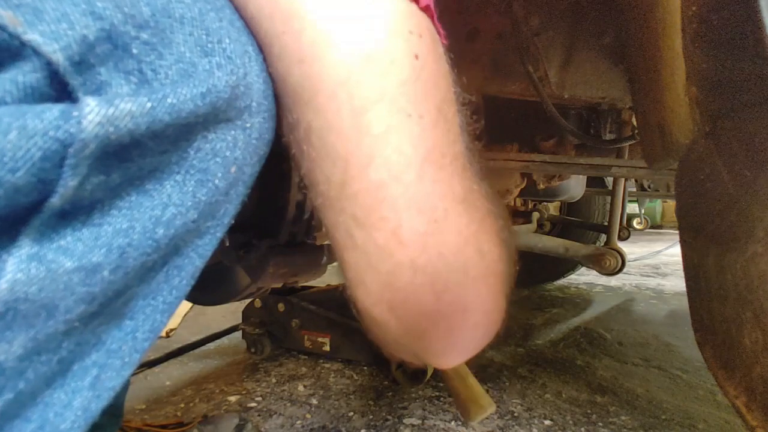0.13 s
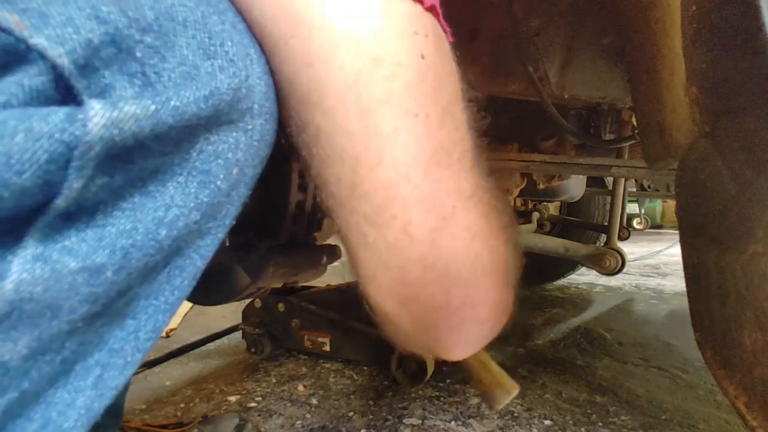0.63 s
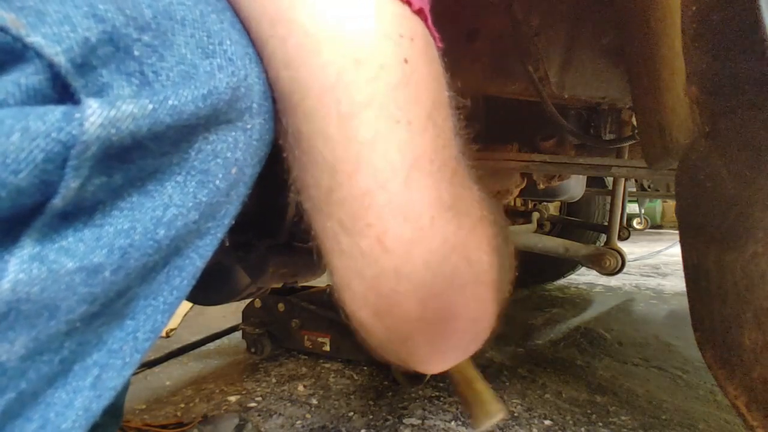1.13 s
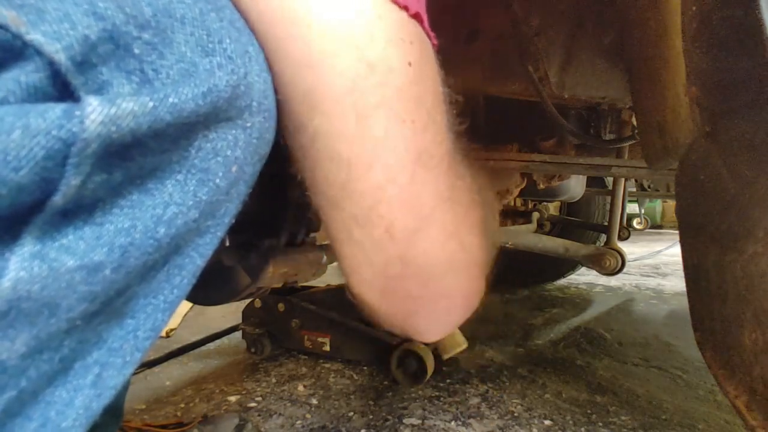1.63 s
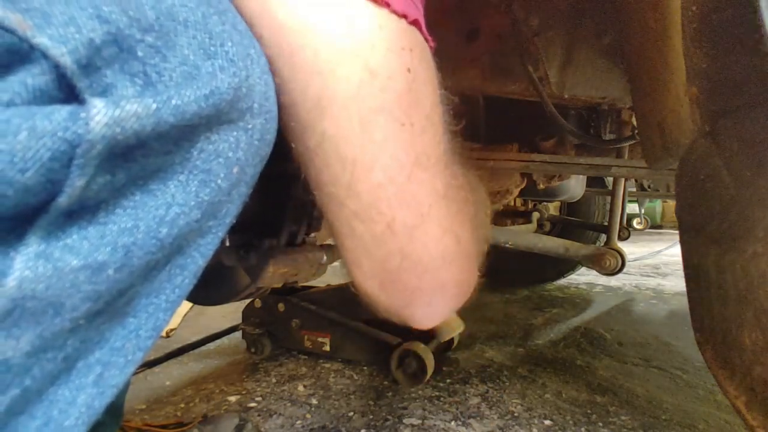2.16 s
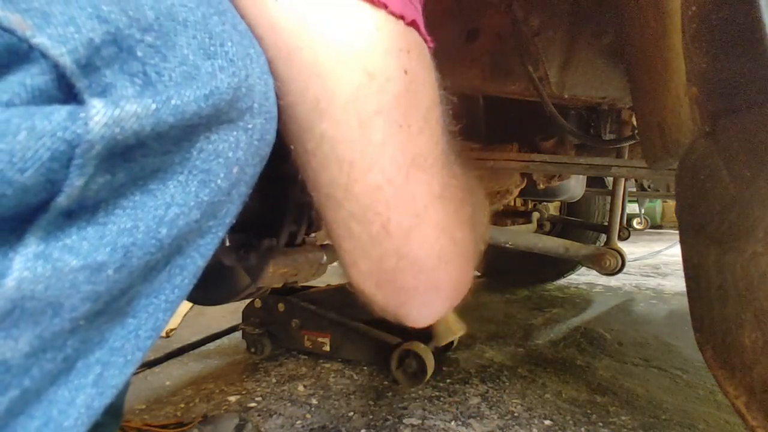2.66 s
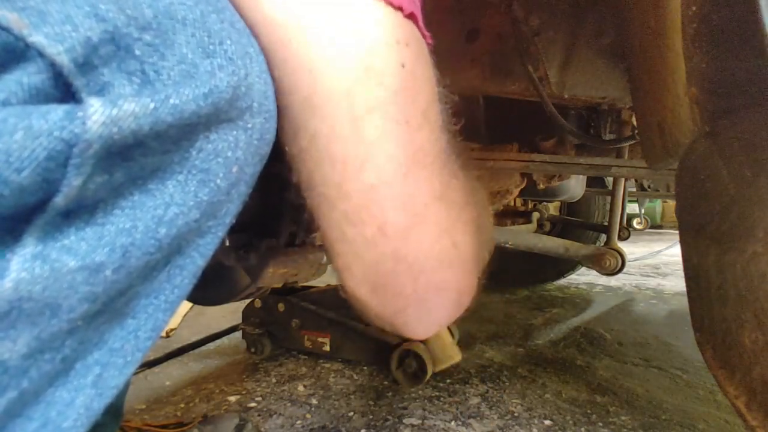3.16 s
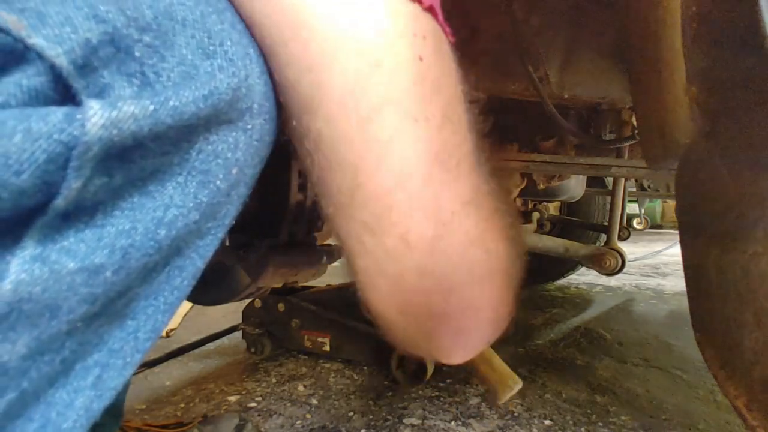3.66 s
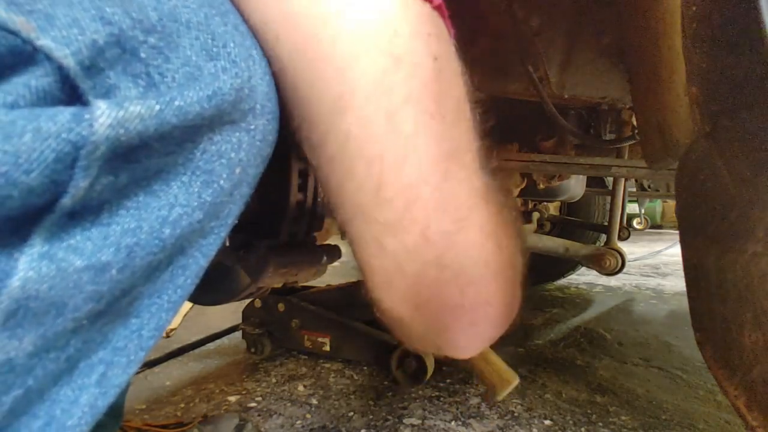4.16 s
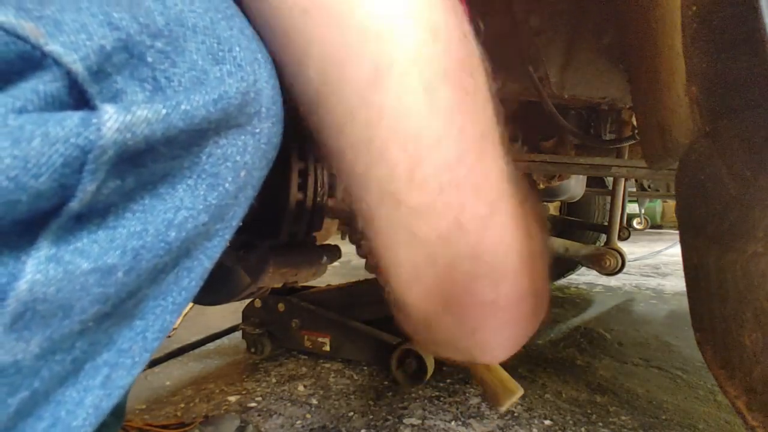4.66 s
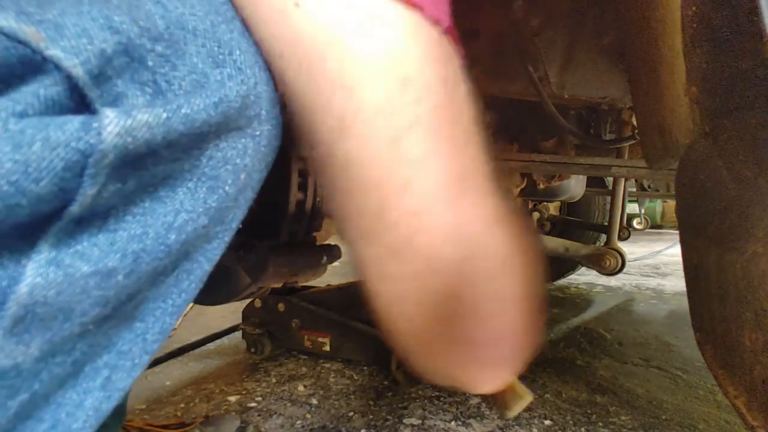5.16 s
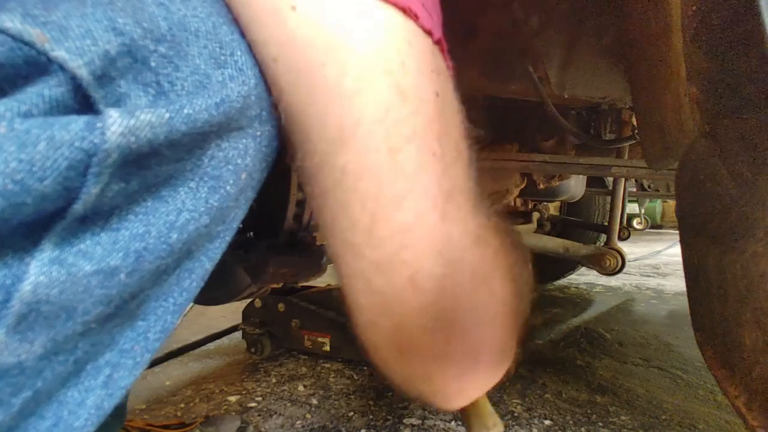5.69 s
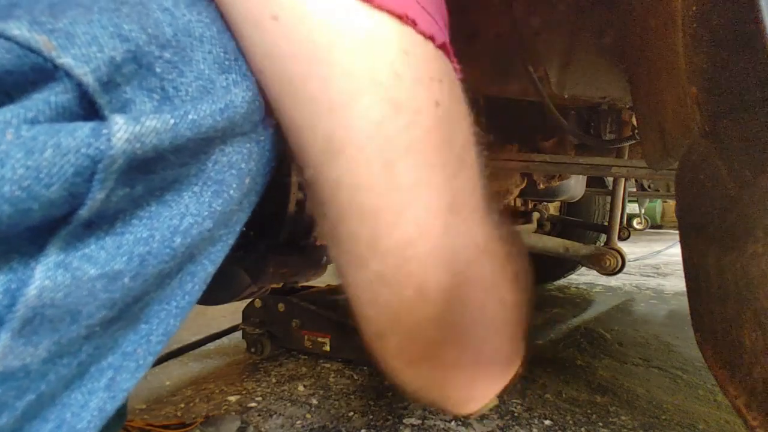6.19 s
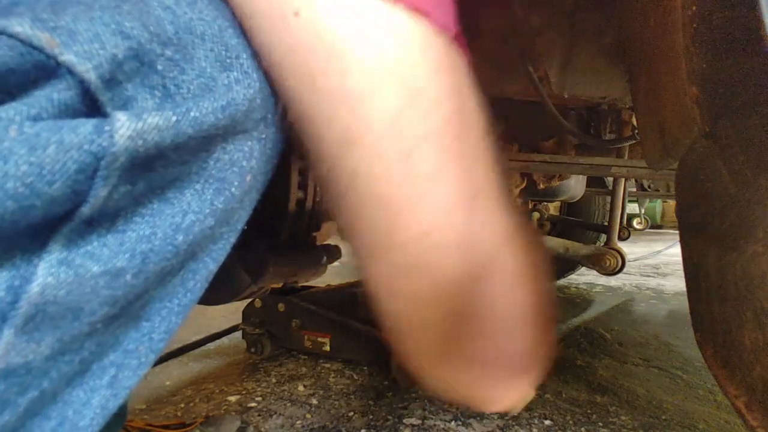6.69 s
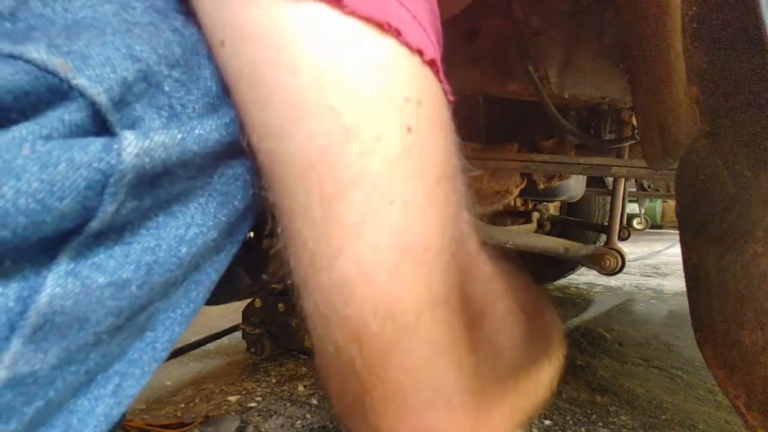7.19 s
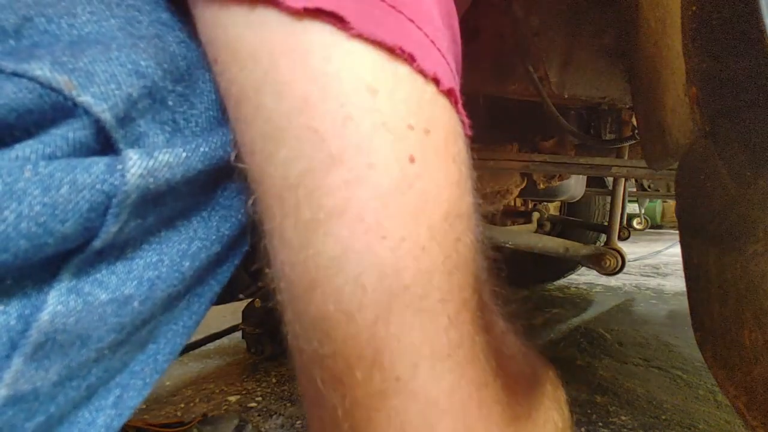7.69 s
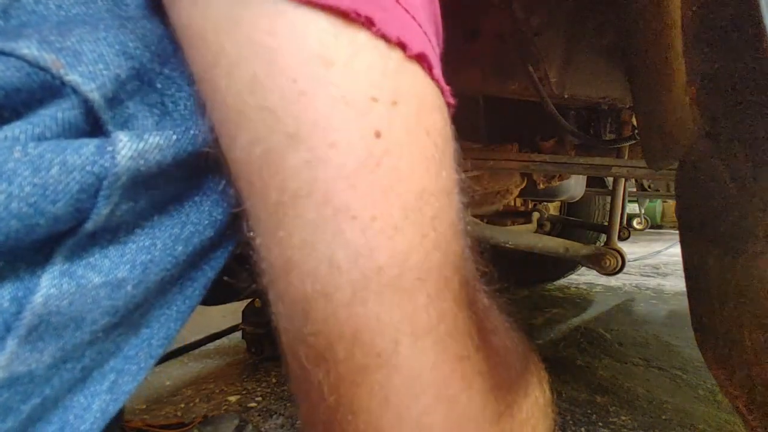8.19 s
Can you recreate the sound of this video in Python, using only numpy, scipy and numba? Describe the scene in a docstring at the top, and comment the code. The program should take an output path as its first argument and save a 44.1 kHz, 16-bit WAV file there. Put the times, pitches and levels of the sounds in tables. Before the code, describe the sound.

On a concrete garage floor, a phone at arm's length catches loud metal hammering on a hub. Twenty-seven brisk blows vary in pitch and brightness, dull and bodied at first, then freer and more ringing, with a brief gap midway and one long singing note. They end abruptly; a quiet cricket trills at left over thin hiss, with a few barely audible taps.

```python
"""A hammer strikes a truck's wheel hub in quick blows, an arm's length from a phone on a garage floor.
Each blow cracks and clangs as shaped noise and rings hub and frame as beating damped sines.
Small knocks, short noise bursts, follow as the hammer is laid down.
A cricket trills on the left, noise through narrow resonances, over faint air of coloured noise.
The phone's gain control dips slightly on every blow; its slow gain drifts under cricket and air."""
import sys
import numpy as np
from scipy import signal
from scipy.fft import rfft, irfft
from scipy.io import wavfile
from scipy.ndimage import uniform_filter1d
from numba import njit

SR = 44100
rng = np.random.default_rng(int(sys.argv[2]) if len(sys.argv) > 2 else 0)


def wav_record(signal):
    """Record a signal, one row per channel, as 16-bit PCM in the file named by sys.argv[1]."""
    frames = np.transpose(np.atleast_2d(signal))
    bounded = np.clip(frames, -1, 1)
    # unit amplitude maps onto the largest positive 16-bit level
    quanta = np.round(bounded * 32767).astype(np.int16)
    wavfile.write(sys.argv[1], SR, quanta)


def elevation(decibels):
    """Turn decibel levels (scalar or array-like) into linear amplitude ratios."""
    levels = np.asarray(decibels, float)
    return 10 ** (levels / 20)


N = 367353

# Hammer blows. Each row: start in seconds, level in dB, brightness in dB, pitch of the leading
# clank in Hz, gain of the long ring in dB.
BLOWS = [(0.005, -13.5, -13.5, 2450, -27), (0.219, -12.5, -11, 1751, -23.5),
         (0.426, -13.5, -25, 1815, -24.5), (0.645, -9, -20.5, 1850, -25.5), (0.856, -16, -4.5, 1778, -25.5),
         (1.063, -15, -6.5, 4270, -25.5), (1.268, -11.5, -15.5, 1463, -22), (1.494, -13.5, -6, 2670, -29.5),
         (1.716, -12.5, -12.5, 1960, -14), (1.926, -12, -10, 1851, -19), (2.138, -15.5, -4, 1638, -25),
         (2.368, -15.5, -3.5, 3533, -22.5), (2.591, -17, -0.5, 2687, -14), (2.819, -15.5, -7, 1760, -16),
         (3.059, -11.5, -11, 3700, -10.5), (3.628, -11.5, -16.5, 4094, -3),
         (3.871, -10.5, -10.5, 2515, -21), (4.121, -15, -4, 2717, -14), (4.382, -15, -3.5, 2743, 5),
         (4.677, -12.5, -7, 1790, -18.5), (4.953, -9.5, -7.5, 3950, -21), (5.24, -10, -7.5, 2620, -18),
         (5.539, -10, -9.5, 4140, -19.5), (5.832, -7.5, -14.5, 2785, -19.5), (6.14, -9.5, -7, 1790, -19.5),
         (6.464, -8, -7, 2622, -20.5), (6.78, -10, -7, 3960, -20.5)]
# The struck spot wanders. Each row: time in seconds, place from 0 = bolted part to 1 = free rim,
# gain of the axle's deep sway in dB.
STRUCK_SPOT = [(0, 0.003, -12), (1.1, 0.044, -15.5), (1.9, 0.24, -13), (2.82, .45, -20),
               (3.06, 1.01, -15.5), (3.63, .6, -8.5), (4.3, 0.94, -16), (4.68, 1.023, -22),
               (6.8, 0.84, -19.5)]
# Ringing modes of the hub. Each row: frequency in Hz, level in dB, t60 in seconds before BEND.
HUB_MODES = [(861, -16, .12), (1060, -7, .2), (1778, -4, .2), (1815, -12, .22), (1938, -14, .16),
             (2485, -6, .36), (2608, -11, .22), (2688, -15, .22), (2775, -10, .18), (3490, -13, .2),
             (3955, -9, .34), (4255, -15, .22), (5453, -14, .2)]
# The thin note that some blows leave singing: frequency in Hz, level in dB, t60 in seconds before BEND.
LONG_RING = (1052, -13, .46)
# Swinging modes of the frame. Each row: frequency in Hz, level in dB, t60 in seconds before BEND.
FRAME_MODES = [(145, -17, .5), (187, -8, .35), (275, 0, .32), (305, -5, .3), (359, -2, .32), (407, -3, .32),
               (436, -4, .36), (490, -2, .22), (930, -29, .6), (1340, -27, 1.0)]
# Dense clang of axle, springs and garage. Each row: frequency in Hz, level in dB, t60 in seconds
# before BEND, left-right likeness from 0 to 1.
CLANG_BANDS = [(41.76, -36.5, 0.36, 0.6), (108, -14, 1, 0.8), (250, 1, 0.46, 0.1), (526, -5, 0.18, 0.7),
               (850, -9, 0.25, 1), (1250, -12.5, 0.24, 0), (2417, -10.5, 0.41, 0), (4110, 1, 0.38, 0),
               (6118, -0.5, 0.38, 0), (7780, -8, 0.24, .3), (12200, -11.5, 0.23, 0.5),
               (15400, -15.5, 0.11, .1)]
# Hub modes struck at the bolts, level in dB against the rim: under 1.4 kHz, to 2.2 kHz, to 3 kHz, above.
HELD_DB = [-21, -14.5, -15, -23.5]
# Small knocks as the hammer is laid down. Each row: start in seconds, level in dB, centre in Hz,
# t60 in seconds before BEND.
KNOCKS = [(7.412, -68, 300, 0.3), (8.018, -61, 900, 0.031), (8.038, -65, 1200, 0.05),
          (8.136, -70.5, 7020, .02)]
# Cricket level on the left as the phone's slow gain sinks and recovers. Each row: time in seconds,
# level in dB.
CRICKET_GAIN = [(0, -59.5), (3.6, -61), (6.0, -64.5), (7.1, -73.5), (7.3, -73), (7.6, -69.5), (7.9, -64.5),
                (8.33, -61)]
# Resonances of the cricket's wing. Each row: frequency in Hz, width in Hz, level in dB.
WING = [(7030, 120, -14), (7200, 150, -15), (7440, 60, 0), (7590, 90, -3)]
# Colour of the air. Each row: frequency in Hz, relative density in dB per Hz.
AIR_COLOUR = [(30, -13.5), (60, -4), (110, 0), (200, -2.5), (380, -4.5), (1100, -15.5), (3800, -15.5),
              (7300, -15), (8700, -17.5), (11000, -25), (15200, -10), (16500, -24.5)]

HUB_DB, FRAME_DB, CLANG_DB, AIR_DB = -1.5, -3, -13, -69.5
BLOW_SAMPLES = 20000
BEND_DB_PER_S2 = 70  # steepens every fall
THUD_DB, THUD_LOSS_DB, THUD_GONE_PLACE = -10, -13, 0.31  # at the bolts; lost by this place
THUD_RISE_S, THUD_RISE_HZ = 0.011, 300  # band rise holds at this frequency and goes with the period
CRACK_DB, CRACK_DB_PER_PLACE, CRACK_DB_PER_BRIGHT_DB = 9, -3.5, -.2  # over the clang
CRACK_RISE_S, CRACK_T60_S = 0.0013, 0.091
TICK_DB, TICK_DB_PER_PLACE, TICK_S, TICK_WIDTH_S = 6, -3, 0.0015, 0.0015  # over the crack
CLANK_DB, CLANK_DB_PER_BRIGHT_DB, CLANK_WIDTH_HZ, CLANK_T60_S = 0.5, .45, 140, 0.31
BODY_DB_PER_PLACE = 1.5  # 450 to 1200 Hz fills toward the rim
BRACKET_DB_PER_PLACE = -11.5  # frame modes above 800 Hz fade toward the rim
# blows brighter than about GLANCE_DB glance: treble offset above 7.7 kHz, square and glancing
GLANCE_DB, GLANCE_SPAN_DB, SQUARE_TREBLE_DB, GLANCING_TREBLE_DB = -7, 0.1, -5, 0
KNOCK_OCTAVES = 0.833  # spread of a knock's colour


def noise(like, count):
    """Left and right noise spectra, alike by a share that depends on frequency."""
    mid, side = rfft(rng.standard_normal((count, 2, len(like) * 2 - 2))).transpose(1, 0, 2)
    like = np.clip(like, 0, 1)
    shared = np.sqrt(1 + like) * mid[:, None]
    opposed = np.sqrt(1 - like) * side[:, None] * [[1], [-1]]
    return (shared + opposed) / np.sqrt(2)


def fade(t, t60_s, rise_s):
    """A rounded rise, then a fall in dB that steepens as it goes."""
    rise = 1 - np.exp(-(t / rise_s) ** 2)
    return rise * elevation(-60 * t / t60_s - BEND_DB_PER_S2 * t ** 2)


def air():
    """Faint air: coloured noise, its bass partly shared by both ports; the treble is heard unsteady."""
    hz = np.fft.rfftfreq(N + 1, 1 / SR) + 1
    knots_hz, knots_db = np.transpose(AIR_COLOUR)
    colour = elevation(np.interp(np.log(hz), np.log(knots_hz), knots_db))
    spectra = noise(0.35 / (1 + (hz / 450) ** 2), count=1)[0] * colour
    low, treble = (irfft(spectra * part)[:, :N] for part in (hz < 11500, hz >= 11500))
    steps = np.repeat(rng.standard_normal((2, N // 1500 + 1)), repeats=1500, axis=1)
    unsteady = uniform_filter1d(steps, size=900)[:, :N]
    # the treble is stronger on the left
    hiss = low + treble * elevation([[1.5], [-1.5]] + 3.2 * unsteady)
    return elevation(AIR_DB) * hiss / low.std()


def cricket():
    """Uneven wing strokes, 46 a second, ring narrow resonances, mostly into the left port."""
    t, hz = np.arange(N) / SR, np.fft.rfftfreq(N, 1 / SR)
    wing = sum(elevation(db) / np.sqrt(1 + (2 * (hz - f) / width) ** 4) for f, width, db in WING)
    wobble = uniform_filter1d(rng.standard_normal(N), size=2000) * 45
    strokes = 1.8 + np.cos(np.pi * 46 * t + 0.78 * wobble) ** 2
    song = strokes * irfft(rfft(rng.standard_normal(N)) * wing, N)
    gain = elevation(np.interp(t, *np.transpose(CRICKET_GAIN)))
    return song / song.std() * gain * elevation([[0], [-17]])


def knocks():
    """Soft wooden taps on concrete: short noise bursts, each coloured around its centre."""
    out, t = np.zeros(N + BLOW_SAMPLES), np.arange(BLOW_SAMPLES) / SR
    hz = np.fft.rfftfreq(BLOW_SAMPLES, 1 / SR) + 1
    grits = rng.standard_normal((len(KNOCKS), BLOW_SAMPLES))
    for (start_s, db, centre_hz, t60_s), grit in zip(KNOCKS, grits):
        tap = irfft(rfft(grit) * np.exp(-(np.log2(hz / centre_hz) / KNOCK_OCTAVES) ** 2))
        start = int(start_s * SR)
        out[start:start + BLOW_SAMPLES] += elevation(db) * fade(t, t60_s, 0.00077) * tap / tap.std()
    return out[:N]


def modes(table, gain_db, rise_s, scatter_db, spread_rad, beat_hz):
    """Damped sines, each a close trio that beats; size and phase vary with blow, ear and sine."""
    hz, db, t60_s = np.tile(np.transpose(table), reps=3)[:, :, None]
    hz = hz + beat_hz * np.repeat([0, 1, -1.6], len(table))[:, None]
    t = np.arange(BLOW_SAMPLES) / SR
    chance = rng.standard_normal((len(BLOWS), 2, 2, len(hz)))
    trio_db = np.repeat([0, -4, -10], len(table))
    size = elevation(np.tile(gain_db, reps=3)[:, None] + db.T + trio_db + scatter_db * chance[:, 0])
    phase = 3 * chance[:, :1, 1] + spread_rad * chance[:, 1]
    sines = fade(t, t60_s, rise_s) * np.exp(2j * np.pi * hz * t)
    return ((size * np.exp(1j * phase)) @ sines).imag


def clank(spectra, hz, t, bright_db, clank_hz):
    """One rough resonance leads each clang: noise through a peak, louder in bright blows."""
    peak = 1 / (1 + ((hz - clank_hz[:, None, None]) / CLANK_WIDTH_HZ) ** 2)
    gain = elevation(CLANK_DB + CLANK_DB_PER_BRIGHT_DB * bright_db)[:, None, None]
    return gain * irfft(spectra * peak) / np.sqrt(np.mean(peak[0] ** 2)) * fade(t, CLANK_T60_S, 0.0004)


def snap(t, place):
    """A crack rises within about a millisecond, with a short tick on top of its start."""
    tick = np.exp(-((t - TICK_S) / TICK_WIDTH_S) ** 2)
    tick_gain = elevation(TICK_DB + TICK_DB_PER_PLACE * place)[:, None, None]
    return fade(t, CRACK_T60_S, CRACK_RISE_S) + tick_gain * tick


def clang(deep_db, thud_db, bright_db, treble_db, crack_db, clank_hz, place):
    """Modes too dense to count, as noise by half octaves: tick and crack on a longer tail, the bass late."""
    t, hz = np.arange(BLOW_SAMPLES) / SR, np.fft.rfftfreq(BLOW_SAMPLES, 1 / SR) + 1
    knots_hz, db, t60_s, like = np.transpose(CLANG_BANDS)
    spectra = noise(np.interp(np.log(hz), np.log(knots_hz), like), count=len(BLOWS))
    # every blow has its own lumps in the spectrum
    lumps = uniform_filter1d(rng.standard_normal((len(BLOWS), 1, len(hz))), size=80) * 9
    spectra = spectra * elevation(2.2 * lumps)
    out = clank(spectra, hz, t, bright_db, clank_hz)

    region = np.searchsorted([170, 450, 1200, 7700], hz)
    body_db = BODY_DB_PER_PLACE * (place - 1)
    regions_db = np.transpose([deep_db, thud_db, body_db, 0 * thud_db, treble_db])
    colour_db = uniform_filter1d(regions_db[:, None, region], size=40)
    # brightness grows over an octave
    colour_db = colour_db + bright_db[:, None, None] * np.clip(np.log2(hz / 2300), 0, 1)
    spectra = spectra * elevation(colour_db)
    crack = elevation(crack_db)[:, None, None] * snap(t, place)
    for centre_hz in 33 * 2 ** np.arange(0, 9.1, .5):
        band_db, band_t60_s = (np.interp(np.log(centre_hz), np.log(knots_hz), c) for c in (db, t60_s))
        shape = np.cos(np.pi * np.clip(np.log2(hz / centre_hz), -.5, .5))
        band = irfft(spectra * shape) / np.sqrt(np.mean(shape ** 2))
        if centre_hz < 800:  # the frame takes a moment to swing
            swing = fade(t, band_t60_s, THUD_RISE_S * THUD_RISE_HZ / centre_hz)
        else:
            swing = fade(t, band_t60_s, 0.0011) + crack
        out = out + elevation(band_db) * band * swing
    return out


def hub(place, long_db):
    """The hub's modes ring freely at the rim and are held at the bolts; a long note may sing on."""
    family = np.searchsorted([1400, 2200, 3000], np.array(HUB_MODES)[:, 0])
    held_db = np.outer(1 - place, HELD_DB)[:, family]
    gain_db = HUB_DB + np.column_stack([held_db, long_db])
    table = np.vstack([HUB_MODES, LONG_RING])
    return modes(table, gain_db, 0.0012, scatter_db=0.8, spread_rad=1.55, beat_hz=7.)


def frame(place, thud_db):
    """The frame's modes swing up slowly in a thud; its thin modes fade toward the rim."""
    thin = np.array(FRAME_MODES)[:, 0] > 800
    gain_db = FRAME_DB + thud_db[:, None] + np.outer(BRACKET_DB_PER_PLACE * place, thin)
    return modes(FRAME_MODES, gain_db, THUD_RISE_S, scatter_db=4.5, spread_rad=0.13, beat_hz=9.5)


def hammer():
    """Every blow sets off clang, hub and frame; the right port hears it a moment sooner."""
    start_s, level_db, bright_db, clank_hz, long_db = np.transpose(BLOWS)
    spot_s, spot_place, spot_deep_db = np.transpose(STRUCK_SPOT)
    place = np.interp(start_s, spot_s, spot_place)
    deep_db = np.interp(start_s, spot_s, spot_deep_db)
    thud_db = THUD_DB + THUD_LOSS_DB * np.clip(place / THUD_GONE_PLACE, 0, 1)
    crack_db = CRACK_DB + CRACK_DB_PER_PLACE * place + CRACK_DB_PER_BRIGHT_DB * bright_db
    glance = 1 / (1 + 2 * np.exp((GLANCE_DB - bright_db) / GLANCE_SPAN_DB))
    treble_db = SQUARE_TREBLE_DB + (GLANCING_TREBLE_DB - SQUARE_TREBLE_DB) * glance
    blows = elevation(CLANG_DB) * clang(deep_db, thud_db, bright_db, treble_db, crack_db, clank_hz, place)
    blows = blows + hub(place, long_db) + frame(place, thud_db)
    out = np.zeros((2, N + BLOW_SAMPLES))
    for start, db, blow in zip((start_s * SR).astype(int), level_db, blows):
        out[:, start:start + BLOW_SAMPLES] += elevation(db) * blow
    return np.array([np.roll(out[0], shift=4), out[1]])[:, :N]


def scene():
    """Hammer and knocks close by; the air drifts a little with the phone's slow gain, as the cricket does."""
    time_s, db = np.transpose(CRICKET_GAIN)
    slow_gain_db = 0.21 * (np.interp(np.arange(N) / SR, time_s, db) - db[-1])
    return hammer() + knocks() + cricket() + air() * elevation(slow_gain_db)


@njit
def follow(x, release):
    """Peak level that jumps up at once and sinks slowly."""
    out, level = np.empty(len(x)), 0.
    for i in range(len(x)):
        level = max(x[i], level * release)
        out[i] = level
    return out


def gain_control(x, floor_db, unity_db, squeeze, ahead_s, release_db_s):
    """Looks ahead; gain falls by a share of the level above the floor and recovers as the blow fades."""
    ahead = int(ahead_s * SR)
    level = follow(np.abs(x).max(0), float(elevation(-release_db_s / SR)))
    level = np.append(level[ahead:], np.zeros(ahead))
    over_db = np.maximum(20 * np.log10(level + 1e-9), floor_db) - unity_db
    return x * elevation(uniform_filter1d(-squeeze * over_db, size=150))


def top_cut(x):
    """Nothing passes above the cut-off."""
    return signal.sosfilt(signal.butter(12, 16810, fs=SR, output="sos"), x)


def record(dry):
    """Gain control, rounded peaks, a cut bottom and top."""
    x = gain_control(dry, floor_db=-47, unity_db=-28.5, squeeze=0.024, ahead_s=0.027, release_db_s=238)
    x = .9 * np.tanh(x / .9)
    x = signal.sosfilt(signal.butter(2, 45, "high", fs=SR, output="sos"), x)
    x = signal.sosfilt(signal.ellip(8, .2, 70, 16600, fs=SR, output="sos"), x)
    return top_cut(x)


dry = scene()
out = record(dry)
wav_record(out)
```